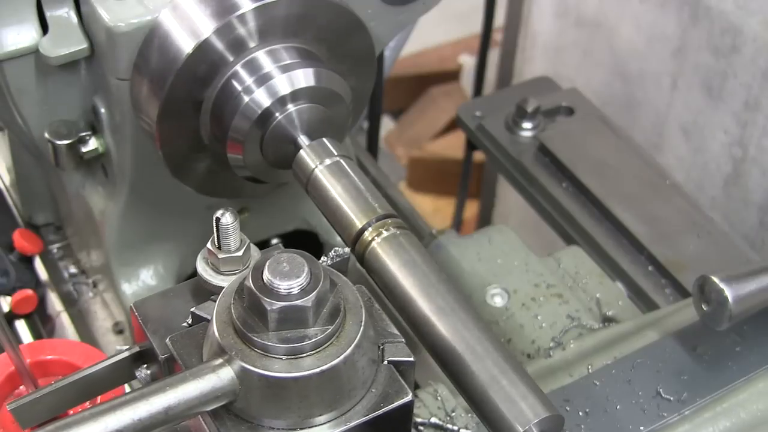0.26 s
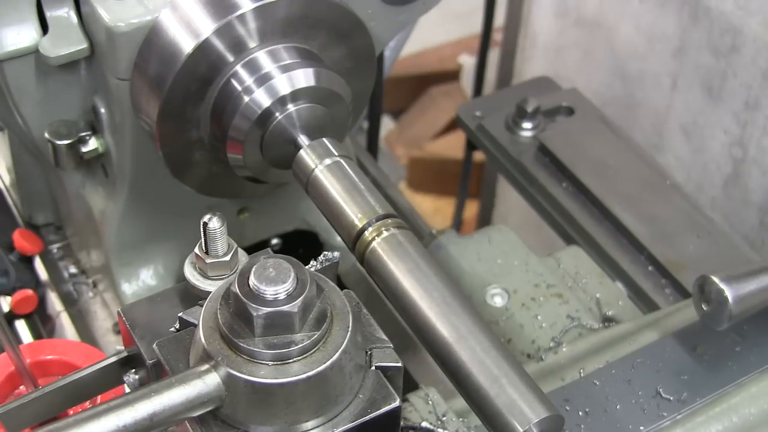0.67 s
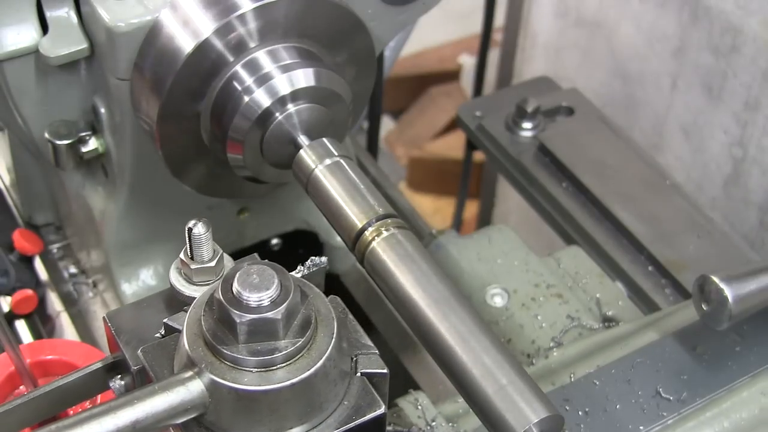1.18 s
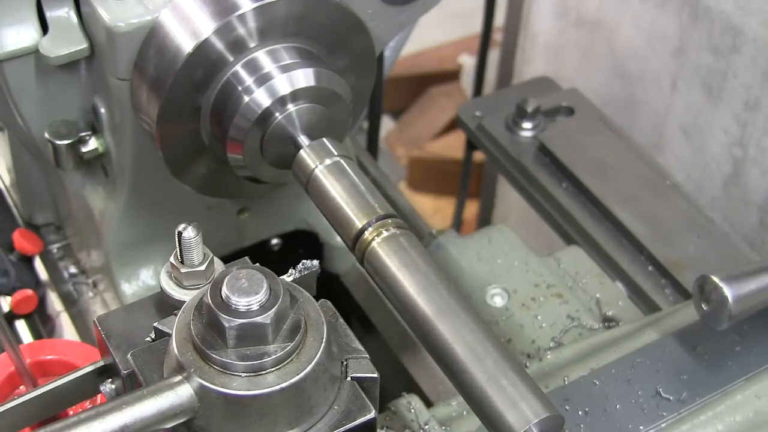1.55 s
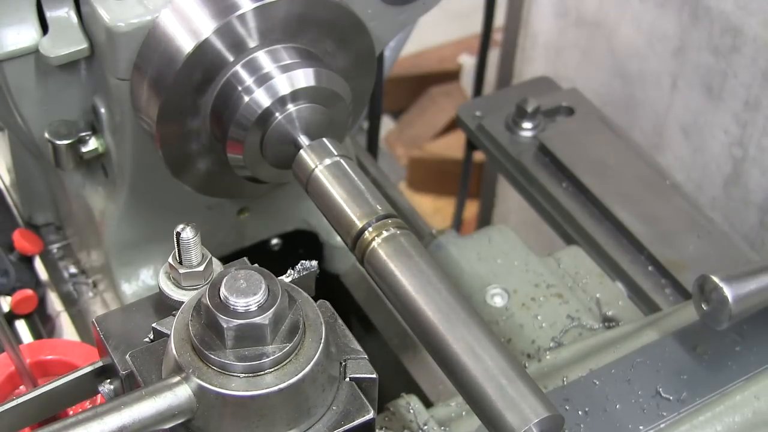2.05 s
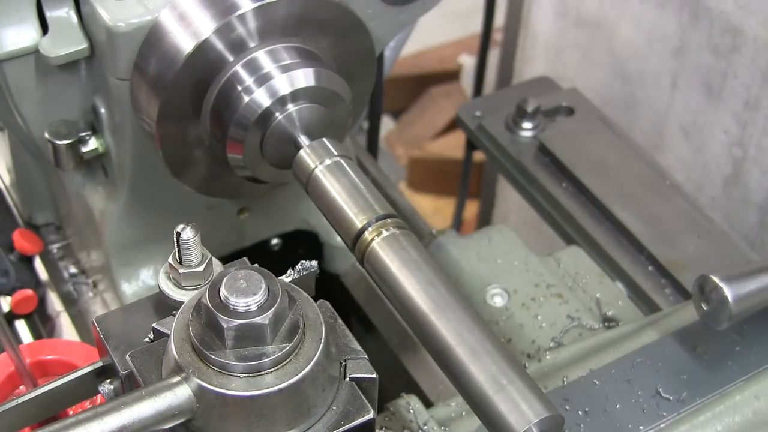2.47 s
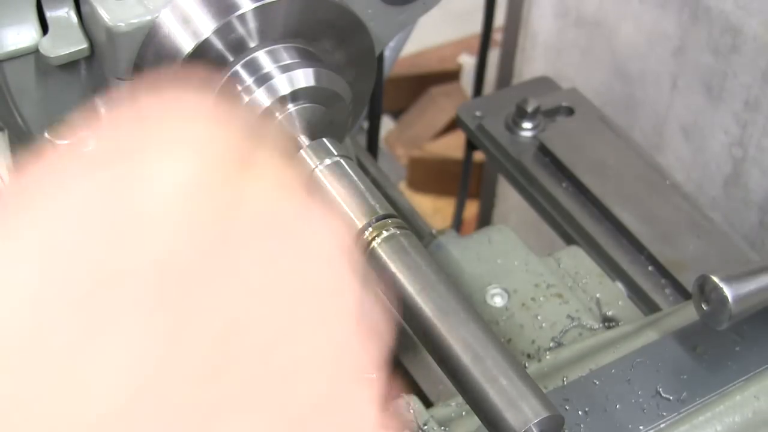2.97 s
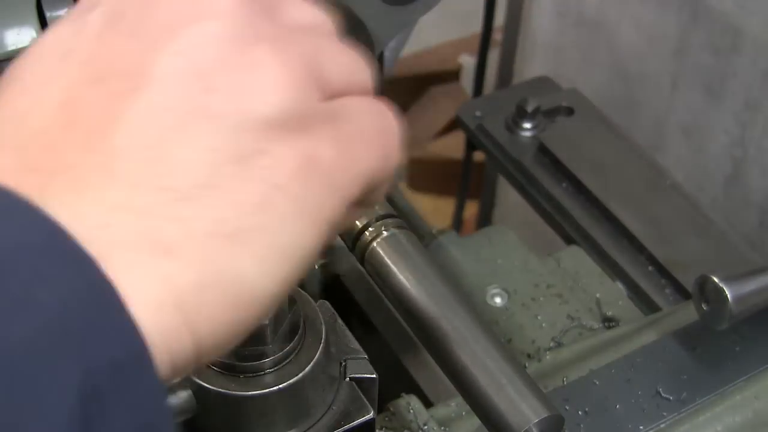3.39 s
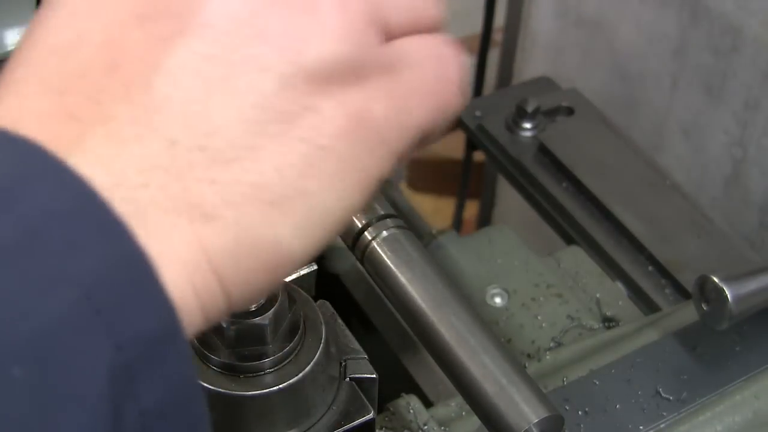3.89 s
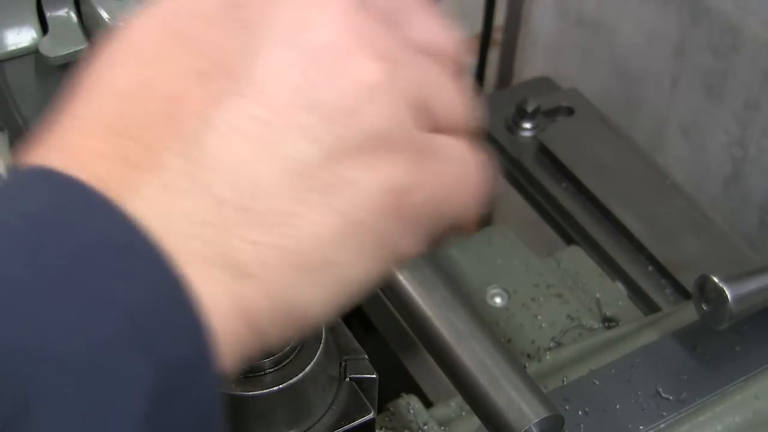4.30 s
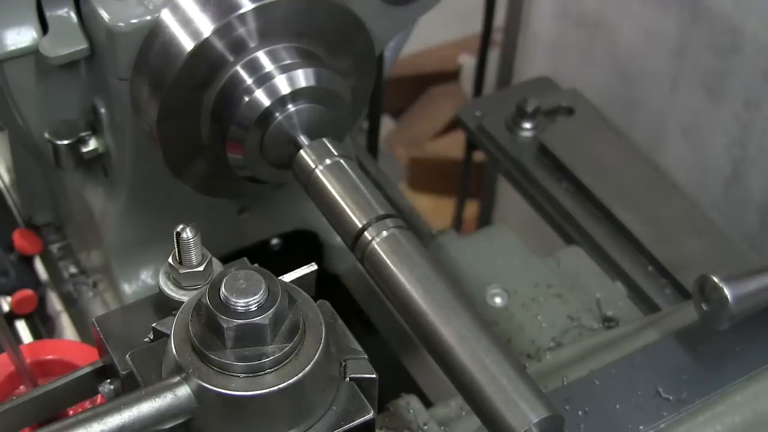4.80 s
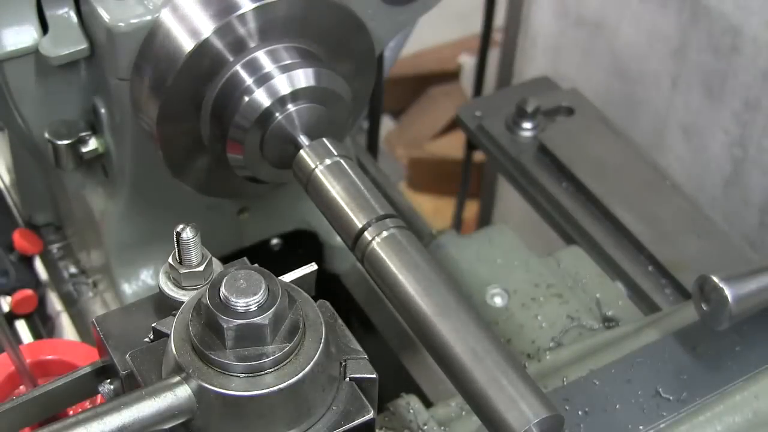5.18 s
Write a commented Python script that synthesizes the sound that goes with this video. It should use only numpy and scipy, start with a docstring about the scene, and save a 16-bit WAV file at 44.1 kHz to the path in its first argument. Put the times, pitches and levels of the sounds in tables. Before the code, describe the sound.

A running lathe drones with uneven gear tones while its tool shrieks repeatedly, dense at first, then more spaced out around two seconds, then busier again with raspy higher chirps. Squeaks are dry and bright, with a faint steel ring and short room reflections. The machine noise grows stronger in the second half. Occasional muffled thuds sit underneath. Close camera microphone, with level pumping around each loud squeal.

```python
"""Small workshop, close by: a metal lathe cuts a groove in a steel bar.
The tool squeals again and again: fluttering sines whose pitch arches in a lower mode and sags in a higher one.
Both excite a narrow ring of the bar and reflect in the room. Under them, unsteady gear tones and
shaped noise make hum, rumble, cutting hiss and dull knocks.
A camera's limiter holds loud squeals down and ducks the machine after them."""
import sys
import numpy as np
from scipy import signal
from scipy.fft import rfft, irfft, next_fast_len
from scipy.io import wavfile
from scipy.ndimage import uniform_filter1d, minimum_filter1d, map_coordinates

SR = 44100
rng = np.random.default_rng(int(sys.argv[2]) if len(sys.argv) > 2 else 0)


def wrap_up_sound(samples):
    """Save the sound to the file named by the first command line argument, as 16-bit audio."""
    columns = np.atleast_2d(samples).T
    # keep every value between -1 and 1, then stretch to whole-number steps
    tamed = np.clip(columns, -1, 1)
    steps = np.round(tamed * 32767).astype(np.int16)
    wavfile.write(sys.argv[1], SR, steps)


N = 240331

# load on the machine, as level of its running noise: time_s, level_db
LOAD = [(0, -26.5), (.3, -26.5), (.5, -31.5), (.8, -29), (1.7, -34), (2.3, -28.5), (2.7, -27.5), (3.1, -22),
        (3.42, -20), (3.7, -23.5), (4.05, -19.5), (4.35, -21.5), (4.65, -16.5), (4.8, -21), (4.9, -18.5),
        (5.1, -21.5), (5.45, -19.5)]
# noise colour of the tool losing its grip: freq_hz, relative_db (per Hz)
SCRAPE_COLOUR = [(300, -20), (1500, -16.5), (3200, -6.5), (4100, 6), (6000, -5.5), (7000, -13),
                 (10000, -1.5), (13000, -18)]


def amp(db):
    """Decibels to gain."""
    return 10 ** (np.asarray(db) / 20)


def unit(x):
    """Scale to rms 1."""
    return x / np.sqrt(np.mean(x ** 2) + 1e-20)


def along(points, hz):
    """(Hz, value) points read on a log frequency axis."""
    f, v = np.transpose(points)
    return np.interp(np.log(hz + 1), np.log(f + 1), v)


def wobble(knots_per_s):
    """Smooth random curve through normally distributed knots."""
    knots = rng.standard_normal(N // 8)
    return map_coordinates(knots, [np.arange(N) * knots_per_s / SR])


def filtered(x, response):
    """Multiply the spectrum of x by a function of frequency."""
    m = next_fast_len(N + SR // 2)
    return irfft(rfft(x, m) * response(np.fft.rfftfreq(m, 1 / SR)), m)[:N]


def noise(colour):
    """Noise of rms 1 with the given colour."""
    return unit(filtered(rng.standard_normal(N), lambda hz: amp(along(colour, hz))))


def strokes(spells, attack_s, release_s):
    """Sample span, time since the start and envelope of each spell of vibration."""
    for start_s, length_s, *_ in spells:
        first = max(int(start_s * SR), 0)
        last = min(int((start_s + length_s + 5 * release_s) * SR), N)
        span = np.arange(first, last)
        t = span / SR - start_s
        rise = np.clip(t / attack_s, 0, 1)
        decay = np.exp(-np.maximum(t - length_s, 0) / release_s)
        yield span, t, np.sqrt(2) * rise * decay


def squeals(flutter_hz, flutter_per_s, sway_hz, shimmer_db, second_db, third_db, break_s, droop_hz,
            rough_rad, scrape_db, fade_db, trough_break):
    """Stick and slip in the lower mode: a fluttering whistle arches in pitch and turns rough as it breaks off."""
    # start_s, length_s, strength_db (before load), crest_s (after start), arch_width_s, crest_pitch_hz
    spells = [(0, 0.038, -0.5, 0.048, 0.077, 6120), (.096, .075, -1, .044, 0.099, 5730),
              (0.289, 0.033, -3, 0.0019, 0.064, 5805), (0.331, 0.022, 0, 0.017, .06, 5970),
              (0.4, 0.097, -3, 0.066, .1, 5624), (.59, 0.046, 0.5, .016, .054, 5797),
              (0.882, .064, -1, .049, 0.075, 5534), (1.063, .054, -1.5, 0.022, 0.084, 5770),
              (1.128, 0.023, 2.5, .025, 0.096, 6040), (1.273, 0.037, -1.5, 0.016, .14, 6110),
              (1.353, .086, 2, .051, .092, 5800), (1.441, .017, 2, .018, .06, 6080),
              (1.537, 0.082, 0, 0.0058, 0.084, 5834), (1.847, 0.052, 1.5, 0.033, 0.07, 5754),
              (2.147, 0.077, 2.5, 0.042, 0.087, 5696), (2.47, 0.1, 4, 0.031, 0.059, 5890),
              (2.869, 0.0089, -10, 0.013, 0.063, 6000), (2.944, 0.069, 2, .041, .08, 5920),
              (3.109, 0.072, -.5, 0.031, 0.07, 5725), (3.572, .077, -1, 0.038, .062, 5895),
              (3.89, 0.069, 0, .043, .064, 5937), (4.068, .057, -2, 0.018, 0.069, 5767),
              (4.199, 0.079, -3.5, .053, 0.07, 5820), (4.442, 0.044, -1.5, 0.052, 0.085, 6250),
              (4.514, 0.091, -0.5, .047, 0.067, 5920), (4.688, 0.078, -1, 0.03, 0.072, 5740),
              (5.009, 0.063, -3, .021, 0.075, 5830), (5.089, 0.015, -11.5, 0.0069, 0.078, 6020),
              (5.168, 0.046, 0, 0.041, .14, 5880), (5.382, .026, 1, 0.038, 0.053, 5760)]
    base_db, db_per_load_db = 27, 1.273
    arch_height_hz = 943.6
    out = np.zeros(N)
    flutter = flutter_hz * wobble(flutter_per_s) + sway_hz * wobble(130)
    shimmer = amp(shimmer_db * wobble(120))
    jitter = wobble(2000)
    scrape = noise(SCRAPE_COLOUR)
    envelopes = strokes(spells, attack_s=0.002, release_s=0.00057)
    for spell, (span, t, envelope) in zip(spells, envelopes):
        start_s, length_s, strength_db, crest_s, arch_s, crest_hz = spell
        progress = np.clip(t / length_s, 0, 1)
        trough = 1 - np.abs(np.cos(np.pi * (t - crest_s) / arch_s))
        glide_hz = crest_hz - arch_height_hz * trough
        # a low ending breaks up harder; the whistle also falters between two arches
        ending = np.clip((t - length_s + break_s) / break_s, 0, 1)
        lowness = np.clip((5750 - glide_hz) / 900, 0, 1)
        breaking = np.maximum(ending * lowness, trough_break * trough ** 2)
        # flutter starts at 72 % and soon reaches full depth
        flutter_share = np.minimum(0.72 + 2 * progress, 1)
        pitch_hz = glide_hz + flutter[span] * flutter_share - droop_hz * breaking ** 2
        phase = 2 * np.pi * np.cumsum(pitch_hz) / SR + rough_rad * breaking * jitter[span]
        tone = np.sin(phase) + amp(second_db) * np.sin(2 * phase) + amp(third_db) * np.sin(3 * phase)
        load_db = np.interp(start_s, *np.transpose(LOAD))
        level = amp(base_db + strength_db + db_per_load_db * load_db + fade_db * progress ** 2)
        voice = tone + amp(scrape_db) * breaking * scrape[span]
        out[span] += envelope * level * shimmer[span] * voice
    return out


def chirps(flutter_hz, flutter_per_s, shimmer_db, second_db, rasp_s, undertone_db, rough_rad, scrape_db):
    """The higher mode; a chirp that ends low ends in a rasp, where the slip repeats only every third cycle."""
    # start_s, length_s, relative_db, sag_bottom_s (after start), bottom_pitch_hz
    spells = [(0.279, 0.015, -18.5, 0.019, 8010), (0.36, .007, -26.5, .003, 9160),
              (.534, .006, -18, -0.0088, 8370), (.758, 0.056, -16.5, 0.039, 7825),
              (1.059, 0.0044, -11, .002, 8160), (1.349, 0.0091, -25.5, .004, 8010),
              (2.062, 0.046, -19, 0.0039, 7980), (2.386, 0.023, -26.5, 0.00056, 8440),
              (2.814, 0.049, -12, 0.037, 7810), (2.866, 0.024, -26, -0.0084, 8400),
              (3.278, .049, -10, 0.044, 8143), (3.448, 0.07, -7, 0.04, 7870),
              (3.663, 0.019, -12.5, -0.0034, 8830), (3.754, 0.0686, -7, .051, 7670),
              (4.142, .025, -11.5, -0.015, 8150), (4.191, 0.0089, -2, 0.017, 7966),
              (4.385, 0.057, -5, 0.038, 7710), (4.856, 0.011, -19.5, -0.018, 8000),
              (5.007, .005, -15, .003, 8130), (5.09, 0.0088, -21.5, -0.017, 8000)]
    sag_s, sag_hz = 0.04, 1273  # half-width and depth of the pitch sag
    rasp_below_hz, rasp_range_hz = 8290, 427  # rasp starts below this pitch, is full this much lower
    swell_db = 3.5  # start to end
    out = np.zeros(N)
    flutter = flutter_hz * wobble(flutter_per_s)
    shimmer = amp(shimmer_db * wobble(190))
    jitter = wobble(700)
    scrape = noise(SCRAPE_COLOUR)
    envelopes = strokes(spells, attack_s=0.0057, release_s=0.00058)
    for spell, (span, t, envelope) in zip(spells, envelopes):
        _, length_s, relative_db, bottom_s, bottom_hz = spell
        glide_hz = bottom_hz + sag_hz * (1 - np.exp(-((t - bottom_s) / sag_s) ** 2))
        lowness = np.clip((rasp_below_hz - glide_hz) / rasp_range_hz, 0, 1)
        rasp = lowness * np.clip((t - length_s + rasp_s) / 0.0086, 0, 1)
        phase = 2 * np.pi * np.cumsum(glide_hz + flutter[span]) / SR + rough_rad * rasp * jitter[span]
        third = phase / 3
        weak_undertones = sum(np.sin(k * third) for k in (1, 4, 5))
        undertones = np.sin(2 * third) + amp(undertone_db) * weak_undertones
        tone = np.sin(phase) + amp(second_db) * np.sin(2 * phase)
        rasping = undertones + amp(scrape_db) * scrape[span]
        level = amp(relative_db + swell_db * (np.minimum(t / length_s, 1) - 0.5))
        voice = (1 - 0.5 * rasp) * tone + rasp * rasping
        out[span] += level * envelope * shimmer[span] * voice
    return out


def ringing(x, centre_hz, width_hz, db):
    """The steel bar as one narrow resonance: squeal energy near its mode rings on."""
    def mode(hz):
        return 1j * hz * width_hz / (centre_hz ** 2 - hz ** 2 + 1j * hz * width_hz)
    return x + amp(db) * filtered(x, mode)


def workshop(x, near_db, tail_db, near_s, count):
    """Quick reflections off chuck and bed, then the room's tail, decaying at its own rate in each band."""
    # reverberation time: freq_hz, t60_s
    room_t60 = [(300, 0.98), (5500, 0.26), (8000, 0.24), (15000, 0.16)]
    hz, t, z = signal.stft(rng.standard_normal(SR // 2), SR, nperseg=256)
    decay = amp(-60 * t / along(room_t60, hz)[:, None])
    tail = signal.istft(z * decay, SR, nperseg=256)[1]
    tail *= np.clip(np.arange(len(tail)) / SR / 0.0089, 0, 1)  # 8.9 ms build-up
    response = amp(tail_db) * tail / np.linalg.norm(tail)
    delays = (SR * near_s * rng.uniform(0.075, 1, count)).astype(int)
    response[delays] += amp(near_db) * rng.choice([-1, 1], count) / np.sqrt(count)
    response[0] += 1  # direct sound
    return signal.fftconvolve(x, response)[:N]


def machine(rumble_db, tones_db, hiss_db, shaft_hz, throb_db, grit_db):
    """Gear tones over gritty rumble and the hiss of the cut, both throbbing at shaft rate."""
    # motor, belt and gears: freq_hz, relative_db, unsteadiness (0-1)
    tones = [(136.3, -14.5, 0.92), (240, -16, 0), (260, -14, 0.12), (369, -10.5, 0.65), (405.6, -13.5, 0.3),
             (432.2, -10.5, 0.9), (440, -8.5, 0.32), (474, -12.5, 0), (539.7, -5.5, 0.45),
             (1099, -15, 0.01), (1158, -18, 0), (1305, -14, 0.1)]
    # freq_hz, relative_db (per Hz)
    rumble_colour = [(18, -72), (30, -32), (54, -80), (111, -4.5), (178, -9.5), (237, 3.5), (486, -5.5),
                     (538, -2), (702, -4.5), (1040, -7), (1120, -6.5), (1320, -5), (1690, -15), (1880, -10),
                     (4000, -32), (5200, -60), (8800, -120)]
    # the cut: freq_hz, relative_db (per Hz)
    hiss_colour = [(2060, -13), (3500, -5.5), (4230, -6), (5340, -5), (6020, -1), (7280, -18.5),
                   (10500, -24), (12800, -21), (15800, -39)]
    t = np.arange(N) / SR
    hum = np.zeros(N)
    for hz, relative_db, unsteady in tones:
        drift = wobble(26) + 1j * wobble(26)
        sway = np.sqrt(1 - unsteady) + np.sqrt(unsteady / 2) * drift
        carrier = np.exp(2j * np.pi * (hz * t + rng.random()))
        hum += amp(relative_db) * np.sqrt(2) * np.real(sway * carrier)
    throb = amp(throb_db * np.sin(2 * np.pi * shaft_hz * t + wobble(9.6)))
    rumble = amp(rumble_db + grit_db * wobble(170)) * noise(rumble_colour)
    hiss = amp(hiss_db + 2.1 * wobble(11)) * noise(hiss_colour)
    load_db = np.interp(t, *np.transpose(LOAD))
    return (amp(tones_db) * hum + throb * (rumble + hiss)) * amp(load_db)


def knocks(t60_s):
    """Short, dull thuds of the machine's body: coloured noise under decaying envelopes."""
    # time_s, level_db
    blows = [(0.251, -29), (1.739, -24.5), (2.005, -32), (2.445, -26.5), (3.557, -25)]
    # freq_hz, relative_db (per Hz)
    thud_colour = [(60, -54), (200, -2), (1300, 6), (2000, -3), (4000, -35), (12000, -64)]
    t = np.arange(N) / SR
    envelope = sum(amp(db - 60 * np.abs(t - s) / t60_s) * (t >= s) for s, db in blows)
    return envelope * noise(thud_colour)


def scene():
    """The squealing tool in the room, over the running machine."""
    low = squeals(flutter_hz=188.6, flutter_per_s=550, sway_hz=55.7, shimmer_db=1.33, second_db=-15.0,
                  third_db=-30.5, break_s=0.01, droop_hz=60, rough_rad=0.082, scrape_db=-13.0,
                  fade_db=-2.0, trough_break=0.21)
    high = chirps(flutter_hz=160, flutter_per_s=540, shimmer_db=3.0, second_db=-26, rasp_s=0.015,
                  undertone_db=-15.0, rough_rad=2.0, scrape_db=-18.0)
    steel = ringing(amp(3.0) * low + amp(1.63) * high, centre_hz=2660, width_hz=9.7, db=6.0)
    tool = workshop(steel, near_db=-10.5, tail_db=-15.5, near_s=0.0084, count=8)
    drive = machine(rumble_db=-2.0, tones_db=0.5, hiss_db=-12, shaft_hz=25.9, throb_db=1.0, grit_db=1.68)
    return (tool + drive + knocks(t60_s=0.26))[None]


def limiter(x, ceiling_db, recovery_db_per_s, hold_s):
    """Gain drops just ahead of a peak, waits, then climbs back at a steady rate in dB."""
    excess_db = np.maximum(20 * np.log10(np.abs(x) + 1e-9) - ceiling_db, 0)
    width = 2 * max(int(hold_s * SR / 2), 1) + 1
    held_db = -minimum_filter1d(-excess_db, width, origin=width // 2)  # running maximum of the past
    climb_db = recovery_db_per_s * np.arange(N) / SR
    cut_db = np.maximum.accumulate(held_db + climb_db) - climb_db
    gain_db = uniform_filter1d(minimum_filter1d(-cut_db, size=75), size=75)
    return x * amp(gain_db)


def record(dry):
    """The camera's microphone colour, limiter and band limit."""
    # freq_hz, gain_db
    microphone = [(45, -1.5), (110, -2.5), (9000, 2), (11500, -1.5), (12800, -19.5), (15800, -4.5)]
    top_hz = 16050
    heard = filtered(dry[0], lambda hz: amp(along(microphone, hz)))
    limited = limiter(heard, ceiling_db=-1.5, recovery_db_per_s=137, hold_s=0.022)
    return filtered(limited, lambda hz: np.clip((top_hz - hz) / 300, 0, 1))[None]


dry = scene()
out = record(dry)
wrap_up_sound(out)
```